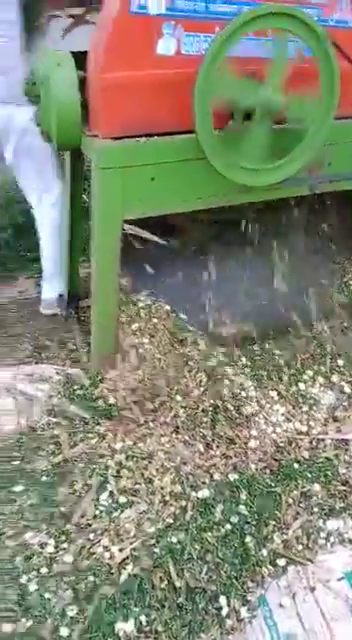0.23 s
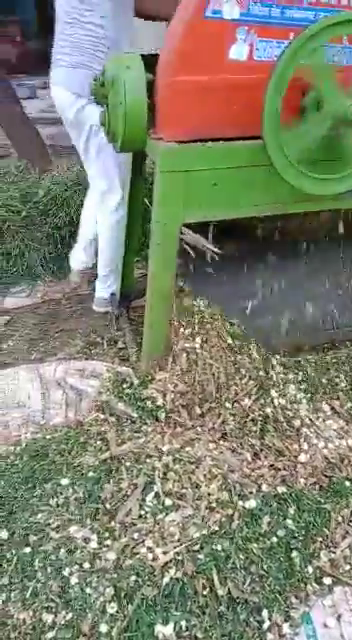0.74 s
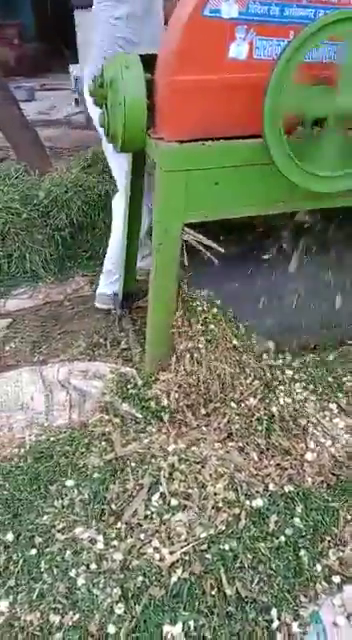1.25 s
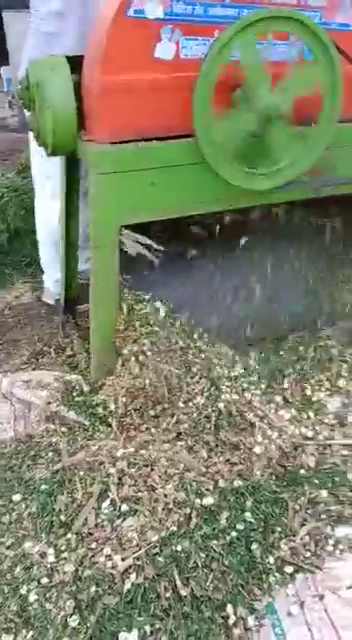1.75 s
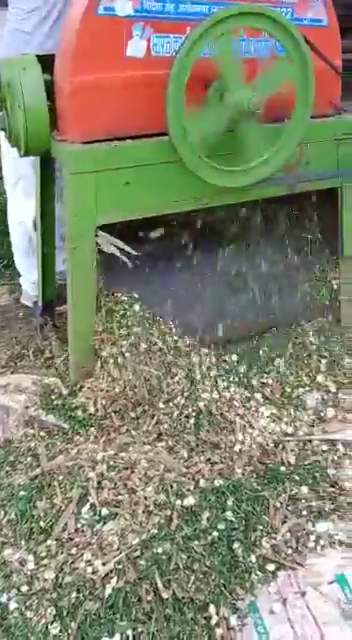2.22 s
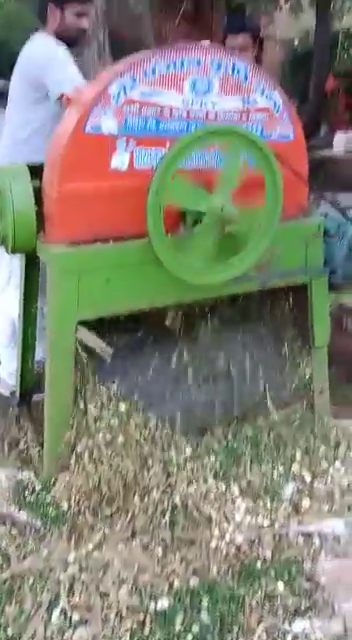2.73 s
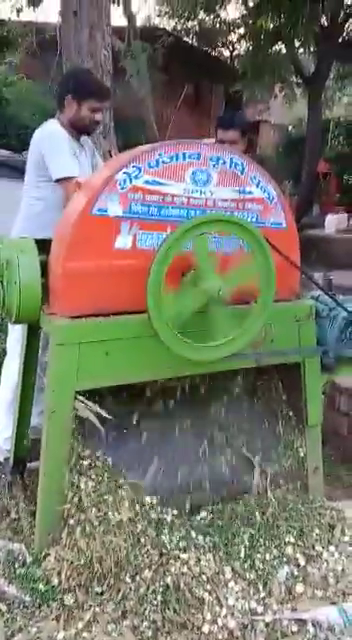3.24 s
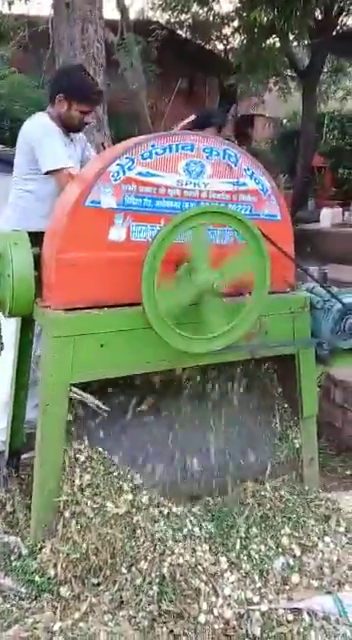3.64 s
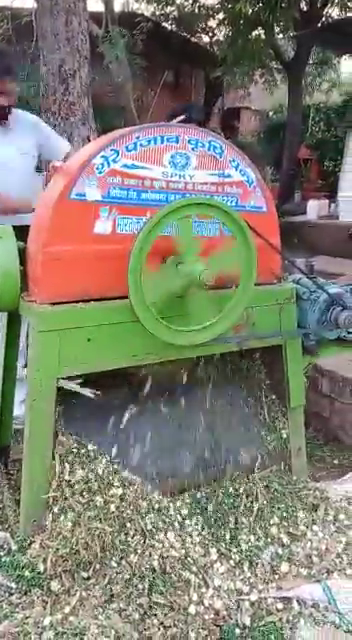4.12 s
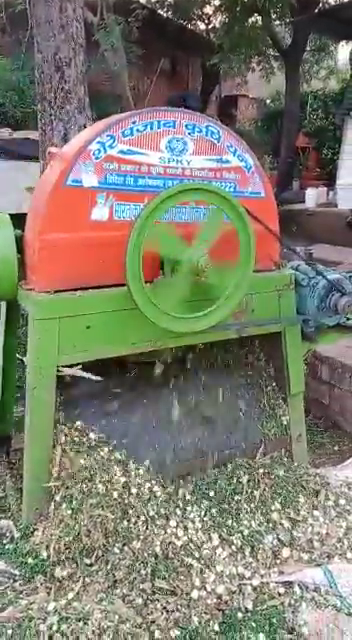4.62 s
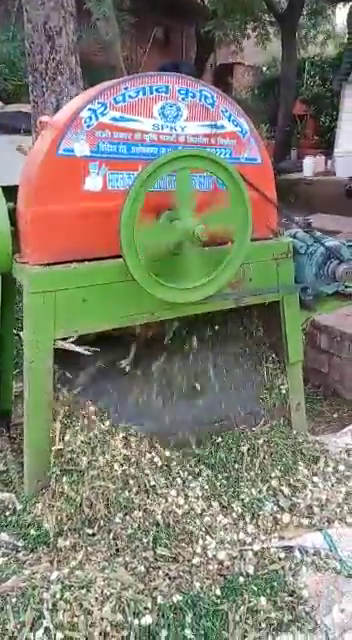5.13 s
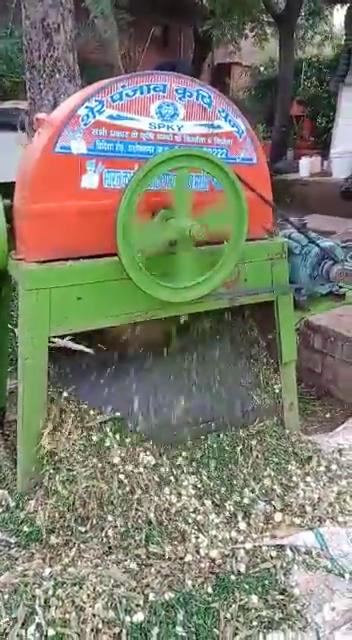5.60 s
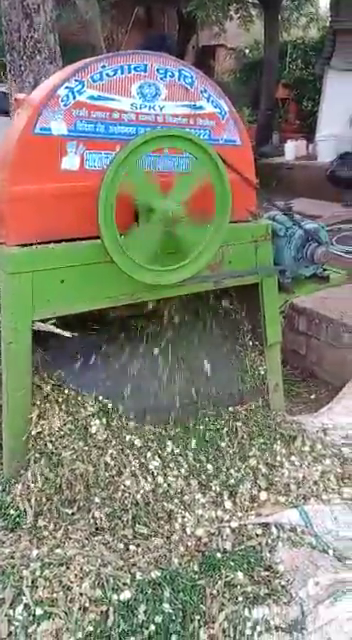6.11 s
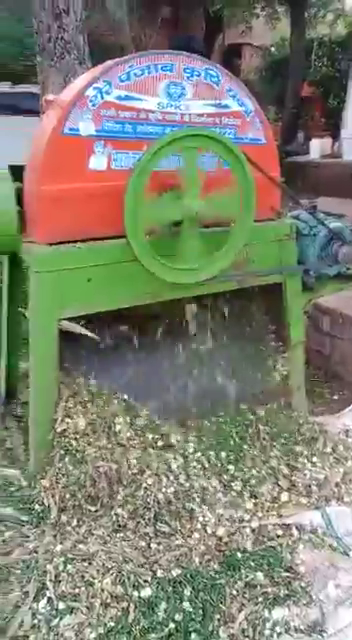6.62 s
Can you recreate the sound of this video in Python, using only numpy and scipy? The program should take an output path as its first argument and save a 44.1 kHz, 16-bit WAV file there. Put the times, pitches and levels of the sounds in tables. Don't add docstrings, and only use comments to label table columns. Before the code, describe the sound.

A steady chopping machine heard close in open air: crisp, bright crunches in uneven pairs, nearly four pairs a second, with rattling chips and random bright pings. A rapid gear clatter, rattling casing, rubbing belt, humming frame and soft low thumps run continuously under it. At first the hood and motor are partly hidden; from about three seconds chaff hiss and motor drone grow clearer, then the motor eases back towards the end.

```python
import sys
import numpy as np
from scipy import signal
from scipy.fft import rfft, irfft, next_fast_len
from scipy.io import wavfile
from scipy.ndimage import uniform_filter1d, map_coordinates

SR = 44100
rng = np.random.default_rng(int(sys.argv[2]) if len(sys.argv) > 2 else 0)


def transcribe(u):
    v = np.clip(np.atleast_2d(u).T, -1, 1)
    q = np.round(v * 32767).astype(np.int16)
    wavfile.write(sys.argv[1], SR, q)


def volts_from_db(level):
    exponent = np.asarray(level, float) / 20
    return 10 ** exponent


N = 302526

# time in seconds, turns done.
WHEEL_TURNS = [(-0.2738, 0), (0.8044, 4), (1.6132, 7), (3.2338, 13), (3.5037, 14), (5.1168, 20),
               (5.388, 21), (6.196, 24), (7.0022, 27)]
KNIFE_AT = [.889, 1.383]
# first knife bite in dB, its lead-in in ms,
# second knife bite in dB, its lead-in in ms.
CUTS = [(-17.5, 25, -23.5, 12), (-18, 13, -22.5, 20), (-16.5, 17, -19.5, 16), (-17, 12, -20.5, 18),
        (-17, 11.5, -20.5, 22), (-19.5, 35, -25, 16), (-20, 18, -22, 30), (-18.5, 30, -23, 34),
        (-19, 27, -22.6, 29), (-19, 24, -23.5, 30), (-21.5, 21, -22.5, 28), (-23.5, 21, -27, 20),
        (-23.5, 21, -27.5, 36), (-22.5, 21, -23.5, 24), (-20, 16, -25, 22), (-21, 22, -23.5, 29),
        (-23, 27, -24, 20), (-22, 24, -23, 55), (-20.5, 13, -23, 21), (-20.5, 18, -24, 13),
        (-20, 17, -24.5, 24), (-21, 17, -23, 29), (-21, 17, -24.5, 20), (-20.5, 22, -24, 21),
        (-20, 10.5, -25.5, 15), (-17.5, 11, -23.5, 29)]
# time in seconds, hood and air in view (0-1), motor and gear in view (0-1).
VIEW = [
    (0, 0.05, 0.4),
    (.9, 0, .2),
    (1.2, 0.4, 0),
    (2.4, 0, .1),
    (2.9, 0.8, 0.96),
    (4.8, .9, 1),
    (5.5, .8, 0.6),
    (6.3, 0.8, .6),
    (6.86, 0.8, 0.35),
]
# frequency in Hz, level in dB per Hz.
BITE_SPECTRUM = [(3300, -70), (4200, -12), (4900, 3.5), (5500, 3), (6300, -4.5), (7300, -8.5), (8200, -19),
                 (9500, -38)]
HISS_SPECTRUM = [(6500, -14), (8000, -2), (10000, -1.5), (12500, -3), (15000, 0), (15500, 1), (15600, -30)]
HOOD_SPECTRUM = [(250, -57), (500, -6), (1000, -2), (1400, -1), (1540, 5), (1620, -13.5), (1720, 4.5),
                 (1900, -10), (2120, -5.5), (2300, -3), (3000, 2.5), (3600, -6), (4100, -9.5), (4800, -24)]
# time in seconds, peak in dB, pitch in Hz.
PINGS = [(0.3556, -26, 3100), (0.7527, -14, 3030), (0.8944, -18, 2890), (1.1702, -20, 3070),
         (1.3144, -13, 3050), (1.4356, -18, 3280), (1.828, -9.5, 3120), (1.9846, -7, 2830),
         (2.0924, -15, 3070), (2.119, -6.5, 3100), (2.6593, -10, 3090), (2.9083, -13.5, 3140),
         (3.4521, -13, 3100), (3.5733, -21, 3280), (3.5952, -16, 2880), (3.7254, -12, 3100),
         (3.8432, -12.5, 2840), (3.8721, -12, 2880), (3.9878, -20, 3130), (4.5331, -16, 2720),
         (5.4784, -16, 3340), (5.611, -21, 3100), (6.0187, -19, 2740), (6.2886, -10, 3140),
         (6.4308, -8.5, 2930), (6.4687, -6.5, 2680), (6.556, -10, 2880), (6.6963, -12.5, 3080),
         (6.782, -17, 2570), (6.8254, -14, 3080)]
# delay in seconds, level in dB, growth in dB for each dB of bite.
CHAFF_S = [.01, .04, .068, .098, .122]
CHAFF_DB = [-44.5, -44.5, -54, -55, -54]
CHAFF_GROWS = [.5, 0.49, 0.37, 0.47, .8]
# time in seconds, swell in dB.
SPILLS = [(.05, 4), (.18, 6), (.86, 12), (.98, 7), (1.39, 3), (1.51, 12), (1.64, 6), (2.42, 0), (3.78, -1),
          (4.29, 8), (4.76, 8), (5.27, 4), (5.69, 6), (6.08, 6), (6.21, 5), (6.36, 0), (6.6, 8)]
# strength of each in dB, then its extra ring in the upper modes in dB.
TEETH_DB = [-0.044, 0.24, -1.2, 0.82, -1.6, 1.1, -0.76, -0.21, -1.3, 0.91, 1.3]
TEETH_BRIGHT_DB = [5, -1, -7, -11, -2, -3, 2, -3, -8, 1, 3]
# pitch in Hz, level in dB, lag in ms, ring in ms.
HOUSING = [(1180, -2, 3, 5.1), (1248, -4, -3, 10), (1299, -11, 2, 8), (1331, 4.5, -1.6, 3.47),
           (1667, -5, 3, 5.3), (2980, -23, 2.5, 1.3)]
# time in seconds, level in dB.
LOAD = [(0.0, -19.5), (0.38, -18), (1.2, -18.5), (1.55, -20.5), (2.94, -17.5), (3.17, -21), (3.44, -18),
        (3.57, -18), (4.26, -17), (5.04, -17.5), (5.39, -19.5), (6.25, -19), (6.4, -18.5), (6.86, -18)]
# time in seconds, swell in dB.
JOLTS = [(.07, 4), (.21, 7.5), (.38, -3), (.9, 3.5), (1.87, 5), (2.92, -1.5), (3.61, 6), (3.76, 5),
         (4.02, 2.5), (5.79, 0.5), (5.92, 2), (6.32, 4.5), (6.46, 3)]
# frequency in Hz, level in dB per Hz.
CASING_SPECTRUM = [(330, -67), (420, -1.5), (600, 1), (780, -2), (870, -4.5), (1050, -2.5), (1250, 6.5),
                   (1420, -8.5), (1520, -2), (1670, 3), (1760, -2.5), (1830, -8.5), (2100, -6.5),
                   (2500, -30)]
WHIRR_SPECTRUM = [(1120, -32), (1900, -24), (2310, -7.5), (2890, -0.5), (3600, -1), (3900, -8.5),
                  (5180, -7.5), (7550, -20), (8500, -39), (11000, -58), (18700, -120)]
MOTOR_SPECTRUM = [(800, -16), (880, -8.5), (936, -2.5), (990, -12), (1100, -5), (1180, -36)]
FRAME_SPECTRUM = [(59, -51), (100, -21), (146, -3.5), (194, -6), (285, 0.5), (384, -7.5), (417, -11),
                  (492, -22), (520, -11.5), (680, -48), (1140, -120)]
GROUND_SPECTRUM = [(15, -55), (25, -25), (54, -14.5), (81, 3.5), (115, 4.5), (150, -53), (250, -120)]
# pitch in Hz, width in Hz, level in dB.
HUM_MODES = [(144, 49, -4), (161, 16, -6), (244, 12, -3.5), (288.6, 28, 1.5), (322, 33, -8.5),
             (422.7, 23, -3), (466, 34, -7.5), (581, 38, -7), (741, 33, -11), (916, 48, -8),
             (1640, 74, -4.5)]
# time in seconds, peak in dB.
THUMPS = [(0, -38), (.61, -45), (.88, -29), (1.28, -28.5), (1.78, -29.5), (2.08, -26), (2.29, -45),
          (2.46, -39), (2.96, -35), (3.11, -43), (3.76, -34), (3.95, -27), (4.24, -33), (4.51, -32),
          (4.66, -29), (4.83, -38), (5.08, -28), (5.42, -37), (5.69, -31.5), (6.09, -29.5), (6.42, -31.5),
          (6.74, -26.5)]

USUAL_BITE_DB = -21.5
HISS_DB, HOOD_DB, SHOWER_DB = -36, -21, -7.5
HISS_GROWS, HOOD_GROWS, SHOWER_GROWS = 0.6, 0.62, -0.22
HISS_SEEN_DB, HOOD_SEEN_DB, CHAFF_SEEN_DB = 4, 2.9, 3
MOTOR_SEEN_DB, GEAR_SEEN_DB = 14, 2.5
FRAME_DB, CASING_DB, GEAR_DB, WHIRR_DB, MOTOR_DB = -20.5, -26, -25, -28.5, -43.5
STAND_DB = -45
BRIGHT_HZ = 1500


def knives():
    t = np.arange(N) / SR
    power = np.zeros((3, N))
    rise_s = [[0.02], [0.024], [0.02]]
    fall_s = [[0.015], [0.014], [0.018]]
    shower_share = [[0.3], [0.3], [1.1]]
    for s, bite_db, lead_ms, seen in zip(*passes()):
        over_db = bite_db - USUAL_BITE_DB
        hiss_db = HISS_DB + HISS_GROWS * over_db + HISS_SEEN_DB * seen
        hood_db = HOOD_DB + HOOD_GROWS * over_db + HOOD_SEEN_DB * seen
        shower_db = SHOWER_DB + SHOWER_GROWS * over_db
        span = slice(max(round((s - 0.06) * SR), 0), round((s + 0.25) * SR))
        u = t[span] - s
        entered = 1 / (1 + np.exp(-(u + lead_ms / 1000) / 0.0023))
        shear = np.exp(-(u / np.where(u < 0, rise_s, fall_s)) ** 2)
        after_s = u - 0.035
        shower_shape = np.exp(-np.abs(after_s / np.where(after_s < 0, 0.06, 0.04)) ** 1.4)
        shower = volts_from_db(2 * shower_db) * shower_shape
        parts_db = np.array([[bite_db + 0.5], [hiss_db], [hood_db + 0.5]])
        power[:, span] += volts_from_db(2 * parts_db) * entered * (shear + shower * shower_share)
    stalks = patchy(gritty(500, depth_db=1.0), depth_db=1.67)
    layers = [coloured(stalks, spectrum) for spectrum in (BITE_SPECTRUM, HISS_SPECTRUM, HOOD_SPECTRUM)]
    uneven_feed = volts_from_db(0.69 * wobble(60))
    return uneven_feed * np.sum(np.sqrt(power) * layers, axis=0)


def passes():
    s = moment(np.add.outer(np.arange(len(CUTS)), KNIFE_AT).ravel())
    bite_db, lead_ms = np.reshape(CUTS, (-1, 2)).T
    hood_seen = np.interp(s, *np.transpose(VIEW)[:2])
    return s, bite_db, lead_ms, hood_seen


def moment(turns):
    s, done = np.transpose(WHEEL_TURNS)
    return np.interp(turns, done, s)


def pings():
    s, db, hz = np.transpose(PINGS)
    ring = rings(s + 0.003, hz, volts_from_db(db - 4), life_s=0.0033, slip=1)
    splinter_s = np.repeat(s, repeats=6) + rng.uniform(0, 0.012, 6 * len(s))
    splinter_hz = 3600 * np.exp(0.32 * rng.standard_normal(len(splinter_s)))
    splinter_gain = volts_from_db(np.repeat(db, repeats=6) - 14.5)
    return ring + rings(splinter_s, splinter_hz, splinter_gain, life_s=0.0016, slip=1.0)


def dust():
    s, bite_db, _, seen = passes()
    seen_db = CHAFF_SEEN_DB * np.outer(seen, [0.97, 0.85, 0.29, 0.26, 0.1])
    db = CHAFF_DB + np.outer(bite_db - USUAL_BITE_DB, CHAFF_GROWS) + seen_db
    rows = np.transpose([np.add.outer(s, CHAFF_S).ravel(), db.ravel()])
    spill_db = humps(SPILLS, rise_s=0.015, fall_s=0.009)
    fall_db = curves(rows)[0] + spill_db + 0.68 * wobble(15)
    chaff = patchy(gritty(200, depth_db=1.9), depth_db=3.0)
    return volts_from_db(fall_db) * (coloured(chaff, HISS_SPECTRUM) + volts_from_db(9) * coloured(chaff, BITE_SPECTRUM))


def gear():
    tooth = np.arange(len(TEETH_DB) * WHEEL_TURNS[-1][1])
    chance = rng.standard_normal((len(tooth), 2))
    s = moment(tooth / len(TEETH_DB)) + 0.00012 * chance[:, 0]
    blow_db = np.resize(TEETH_DB, len(s)) + 1.95 * chance[:, 1]
    bright_db = np.resize(TEETH_BRIGHT_DB, len(s))
    knocks = np.zeros(N)
    for hz, db, lag_ms, ring_ms in HOUSING:
        gain = volts_from_db(db + blow_db + (hz > BRIGHT_HZ) * bright_db)
        knocks += rings(s + lag_ms / 1000, np.full(len(s), hz), gain, ring_ms / 1000, slip=0.14)
    level_db = worked(GEAR_DB, grows=1.02, jolt_share=0.25) + GEAR_SEEN_DB * curves(VIEW)[1]
    return volts_from_db(level_db) * unit(knocks)


def casing():
    level_db = worked(CASING_DB, grows=0.59, jolt_share=1.37) + 1.0 + 0.83 * wobble(6.4)
    rattle = patchy(gritty(120, depth_db=2.0), depth_db=1.0)
    return volts_from_db(level_db) * coloured(rattle, CASING_SPECTRUM)


def whirr():
    level_db = worked(WHIRR_DB, grows=0.94, jolt_share=1.06) - 1.0 + 0.22 * wobble(25)
    rub = patchy(gritty(250, depth_db=2.5), depth_db=1.5)
    return volts_from_db(level_db) * coloured(rub, WHIRR_SPECTRUM)


def motor():
    level_db = MOTOR_DB + MOTOR_SEEN_DB * curves(VIEW)[1]
    return volts_from_db(level_db) * coloured(gritty(60, depth_db=2.0), MOTOR_SPECTRUM)


def frame():
    turn = np.interp(np.arange(N) / SR, *np.transpose(WHEEL_TURNS))
    heave_db = 0.54 * np.cos(4 * np.pi * (turn - 0.47))
    level_db = worked(FRAME_DB, grows=1.06, jolt_share=0.53) + heave_db
    rumble = volts_from_db(0.82 * wobble(17) - 1.5) * coloured(gritty(30, depth_db=-0.8), FRAME_SPECTRUM)
    return volts_from_db(level_db) * (rumble + volts_from_db(-6.0) * hum())


def hum():
    m = next_fast_len(N + 8192)
    f = np.fft.rfftfreq(m, 1 / SR)
    modes = sum(volts_from_db(db) / np.sqrt(w) / (1 + (2 * (f - hz) / w) ** 2) for hz, w, db in HUM_MODES)
    return unit(irfft(rfft(rng.standard_normal(N), m) * modes, m)[:N])


def stand():
    thumps = [(s, volts_from_db(db)) for s, db in THUMPS]
    rocking = volts_from_db(STAND_DB) + humps(thumps, rise_s=0.028, fall_s=0.035)
    return rocking * coloured(rng.standard_normal(N), GROUND_SPECTRUM)


def worked(usual_db, grows, jolt_share):
    load_db = curves(LOAD)[0]
    jolt_db = humps(JOLTS, rise_s=0.019, fall_s=0.029)
    return usual_db + grows * (load_db - load_db.mean()) + jolt_share * jolt_db


def unit(x):
    return x / np.sqrt(np.mean(x ** 2) + 1e-20)


def curves(rows):
    s, *cols = np.transpose(rows)
    return [np.interp(np.arange(N) / SR, s, c) for c in cols]


def wobble(rate):
    knots = rng.standard_normal(int(N * rate / SR) + 4)
    return map_coordinates(knots, [np.arange(N) * rate / SR])


def humps(events, rise_s, fall_s):
    t = np.arange(0, N, 64) / SR
    s, height = np.transpose(events)
    u = t - s[:, None]
    swells = np.exp(np.where(u < 0, u / rise_s, -u / fall_s))
    return np.interp(np.arange(N) / SR, t, height @ swells)


def coloured(x, spectrum):
    m = next_fast_len(N + 8192)
    hz, db = np.transpose(spectrum)
    f = np.fft.rfftfreq(m, 1 / SR)
    gain = volts_from_db(np.interp(np.log(f + 1), np.log(hz + 1), db, -120, -120))
    return unit(irfft(rfft(x, m) * gain, m)[:N])


def gritty(rate, depth_db):
    return volts_from_db(depth_db * wobble(rate)) * rng.standard_normal(N)


def patchy(x, depth_db):
    z = signal.stft(x, nperseg=256)[2]
    field = uniform_filter1d(rng.standard_normal(z.shape), size=9, axis=0)
    field = uniform_filter1d(field, size=9, axis=1)
    return signal.istft(z * volts_from_db(depth_db * unit(field)), nperseg=256)[1][:N]


def rings(s, hz, gain, life_s, slip):
    k = np.arange(-SR // 60, SR // 30)
    u = k / SR / life_s
    shape = np.exp(-np.where(u < 0, u * u, np.sqrt(1 + u * u * 2) - 1))
    start = np.round(s * SR).astype(int)[:, None]
    cycles = hz[:, None] * k / SR + slip * rng.standard_normal((len(s), 1))
    wave = shape * np.sin(2 * np.pi * cycles)
    at = np.clip(start + k, -1, N) + 1
    return np.bincount(at.ravel(), (gain[:, None] * wave).ravel(), N + 2)[1:-1]


def scene():
    cutting = knives() + pings() + dust()
    machine = gear() + casing() + whirr() + motor() + frame() + stand()
    return (cutting + machine)[None]


def top_cut(x):
    return signal.sosfilt(signal.butter(12, 16850, fs=SR, output="sos"), x)


def record(dry):
    held = dry / (1 + np.abs(dry / 0.95) ** 4) ** (1 / 4)
    band = signal.cheby2(16, 14, 15560, fs=SR, output="sos")
    return top_cut(signal.sosfiltfilt(band, held))


dry = scene()
out = record(dry)
transcribe(out)
```